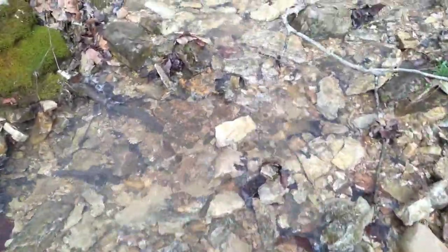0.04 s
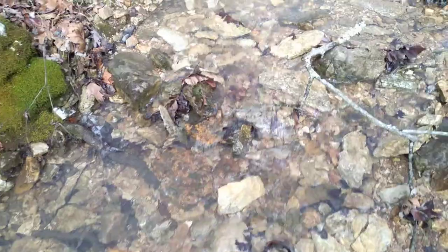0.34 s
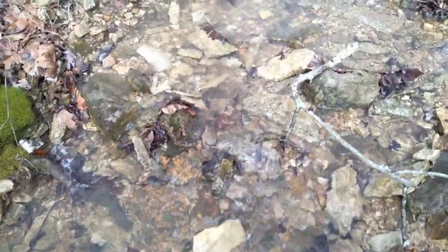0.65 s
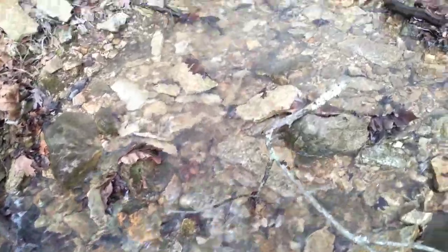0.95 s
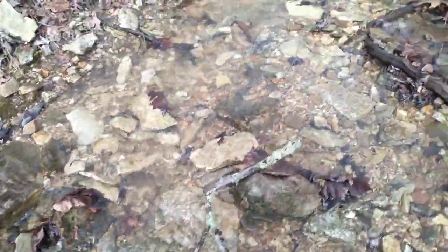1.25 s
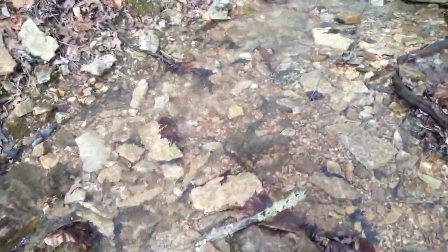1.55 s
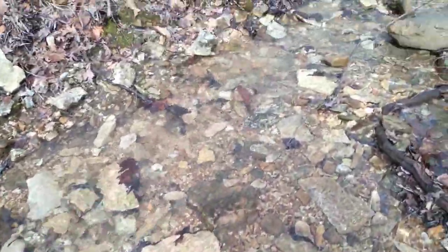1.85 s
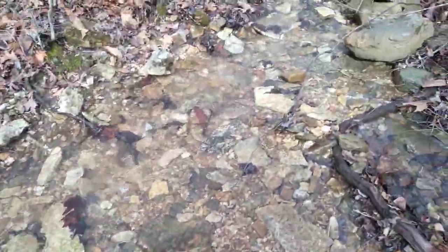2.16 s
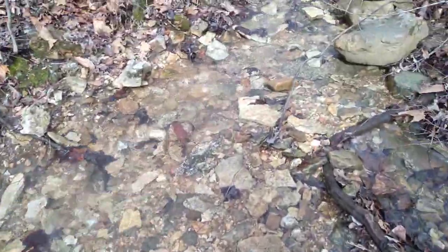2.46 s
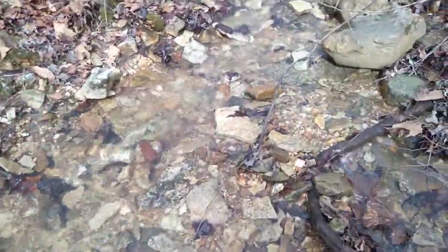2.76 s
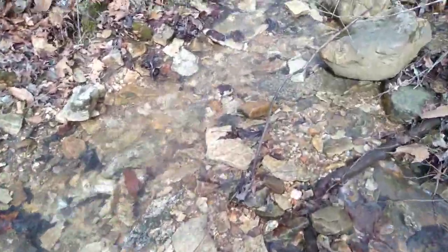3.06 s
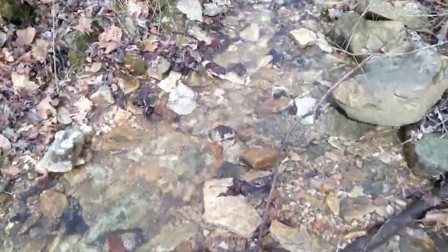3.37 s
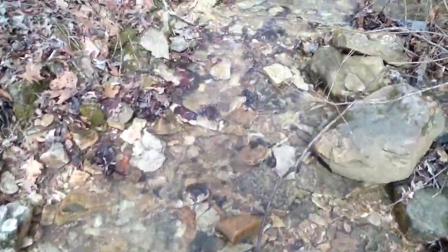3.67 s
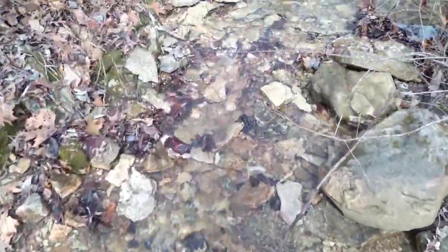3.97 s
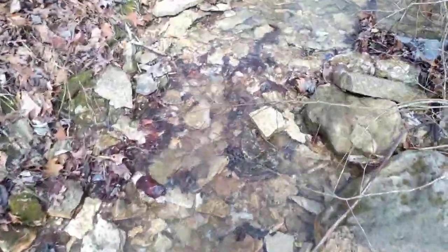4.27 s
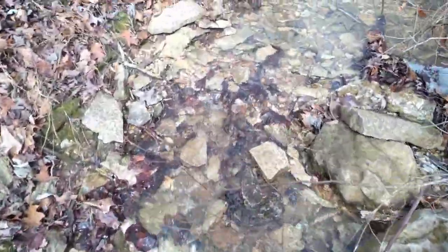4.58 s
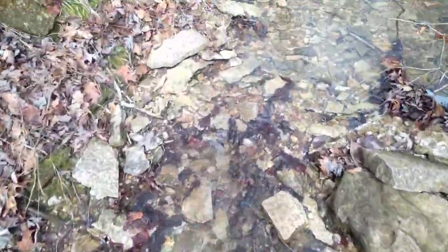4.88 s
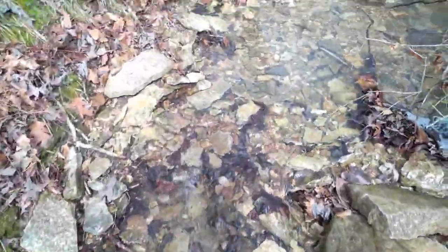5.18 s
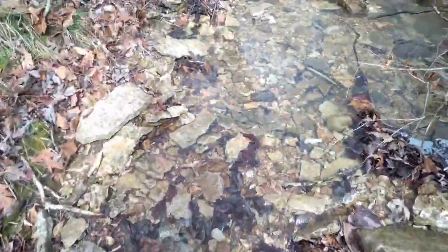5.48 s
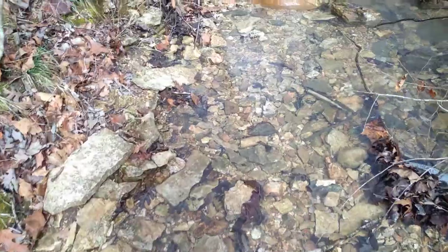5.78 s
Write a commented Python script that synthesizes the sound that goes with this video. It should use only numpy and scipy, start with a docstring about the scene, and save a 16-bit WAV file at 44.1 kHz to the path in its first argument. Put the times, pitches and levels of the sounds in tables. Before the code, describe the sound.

Someone wades over wet gravel in a softly trickling stream, with light splashes, gurgles and a few sharp stone cracks.

```python
"""A shallow stony creek, walked with slow, uneven steps and heard from a hand-held microphone.
Impacts excite damped resonances: boots thud and grind into wet gravel, a loose slab knocks hollowly,
stones crack together and pebbles tick. Air bubbles oscillate as glugs and plips around the boots,
and droplets patter down. Wet clothing ticks and crackles with friction close on the right,
while the creek trickles underneath."""
import sys
import numpy as np
from scipy import signal
from scipy.fft import rfft, irfft
from scipy.io import wavfile
from scipy.ndimage import uniform_filter1d

SR = 44100
rng = np.random.default_rng(int(sys.argv[2]) if len(sys.argv) > 2 else 0)


def persist_wave(psi):
    """Save psi, clipped to +-1, as 16-bit WAV."""
    counts = np.round(np.clip(psi, -1, 1) * 32767).astype(np.int16)
    wavfile.write(sys.argv[1], SR, np.atleast_2d(counts).T)


N = 266414
TIME = np.arange(N) / SR
AGE = TIME[:SR // 5]   # time since the onset of a short event

# Levels in all tables are relative; pan is left minus right.
# a boot lands and rolls: (time [s], roll length [s], squelch [dB], gravel [dB], spray [dB], rustle [dB])
STEPS = [(0.271, 0.17, -73, -50, -56, -85), (1.058, 0.092, -61.5, -47, -52, -56),
         (1.699, 0.15, -59, -64, -58.5, -50.5), (2.55, 0.074, -55.5, -57, -54, -54),
         (3.47, 0.023, -62, -60, -63, -68), (4.115, 0.2, -64, -50, -50, -51),
         (4.922, 0.1, -61, -51, -48.5, -51.5), (5.617, 0.21, -69, -56.5, -55.5, -70.5)]
# a leg swings through the shallows: (time [s], length [s], rustle [dB], drips [dB], dragged gravel [dB])
SWINGS = [(0.076, 0.17, -66, -59.5, -61), (0.463, 0.4, -64.5, -61, -64), (0.92, 0.18, -55, -59.5, -52),
          (1.235, 0.29, -59, -61.5, -72), (1.442, 0.13, -57, -74.5, -52), (2.047, 0.15, -57.5, -71, -73.5),
          (2.362, 0.14, -56.5, -83, -75.5), (2.908, 0.033, -61.5, -66, -67),
          (4.508, 0.12, -60.5, -51, -48.5), (4.687, 0.19, -61, -67.5, -59), (5.587, 0.02, -62, -45, -62.5),
          (5.85, 0.42, -69, -60.5, -61)]
# spectrum of a hard snap: (frequency [Hz], level [dB])
SNAP_SPECTRUM = [(200, -41), (1000, -11.5), (1700, -4), (2400, -2), (3300, -10.5), (4600, -2), (6800, 0),
                 (7800, 2), (10200, 4.5), (13000, -4.5), (15500, -5.5)]
# spectrum of churned water: (frequency [Hz], level [dB])
SQUELCH_SPECTRUM = [(35, -27), (80, -10.5), (150, -3), (320, 0.5), (520, 0.5), (850, -12.5), (1500, -20),
                    (3000, -42)]


def from_db(db):
    return 10 ** (np.asarray(db) / 20)


def rms_one(x):
    return x / np.sqrt(np.mean(x ** 2) + 1e-20)


def peak_one(x, size=88):
    """Short-time normalisation: the loudest two milliseconds get rms 1."""
    power = np.mean(np.atleast_2d(x) ** 2, axis=0)
    return x / np.sqrt(uniform_filter1d(power, size).max() + 1e-20)


def panned(left_db):
    """Constant-power panning: left and right gains."""
    return rms_one(from_db(np.array([[left_db], [-left_db]]) / 2))


def add(out, s, sound):
    """Superposition: mix a short stereo sound in at time s."""
    start = int(np.clip(round(s * SR), 0, N - 1))
    out[:, start:start + sound.shape[1]] += sound[:, :N - start]


def excite(response, force):
    """Convolution: a linear resonator answers every impulse of a short force."""
    return signal.fftconvolve(response, force, axes=1)[:, :len(AGE)]


def coloured(x, spectrum, size=2048):
    """Minimum-phase filtering imposes a spectrum causally: nothing sounds early."""
    hz, level_db = np.transpose(spectrum)
    grid = np.maximum(np.arange(size // 2 + 1) * SR / size, 1)
    shape_db = np.interp(np.log(grid), np.log(hz), level_db) - 20 * np.log10(np.maximum(grid / hz[-1], 1))
    cepstrum = irfft(np.log(from_db(shape_db)))
    response = irfft(np.exp(rfft(2 * cepstrum[:size // 2], size)))
    return signal.oaconvolve(x, rms_one(response)[None], axes=1)[:, :x.shape[1]]


def drift(per_s, size=64):
    """Low-passed noise with a spread near 1, wandering about per_s times a second."""
    pole = np.exp(-2 * np.pi * per_s * size / SR)
    noise = rng.standard_normal(2 * N // size)
    slow = signal.lfilter([1], [1, -2 * pole, pole * pole], noise)[-(N // size):]
    return np.interp(np.arange(N) / size, np.arange(len(slow)), np.clip(rms_one(slow), -2, 2))


def grains(per_s, spread_db, hiss_db, count=len(AGE)):
    """Shot noise: uneven clicks over a fine hiss, each with its own lag between the microphone ports."""
    at = rng.integers(0, count, max(int(per_s * count / SR), 1))
    sizes = from_db(spread_db * np.minimum(rng.exponential(1, len(at)), 3)) * rng.choice([-1, 1], len(at))
    lag = np.rint(rng.normal(4, 3.5, len(at))).astype(int)
    clicks = np.zeros((2, count))
    clicks[0, at] = sizes
    clicks[1, np.clip(at + lag, 0, count - 1)] = sizes
    left, independent = rng.standard_normal((2, count))
    right = .8 * np.roll(left, 3) + .6 * independent
    return rms_one(clicks) + from_db(hiss_db) * np.array([left, right])


def ringing_grains(per_s, spread_db, hiss_db, low_hz, high_hz, cycles, patchy_db, spurts_per_s, count):
    """Shot noise drives a resonator bank: each grain size has its own pitch and its own spurts."""
    out, together = 0, drift(spurts_per_s)
    for hz in np.geomspace(low_hz, high_hz, count):
        radius, angle = from_db(-60 * hz / (cycles * SR)), 2 * np.pi * hz / SR
        clicks = grains(per_s / count, spread_db, hiss_db, N)
        clicks *= from_db(patchy_db * (drift(spurts_per_s) + .5 * together))
        for _ in range(2):   # a rounded onset and steep skirts
            clicks = signal.lfilter([1, 0, -1], [1, -2 * radius * np.cos(angle), radius ** 2], clicks)
        out = out + np.sqrt(hz) * rms_one(clicks)
    return rms_one(out)


def ring(hz, t60, lag_s=0., rise=0., attack_s=1e-4, count=len(AGE)):
    """Damped oscillation at both ports; the pitch climbs by the fraction rise in t60 seconds."""
    t = np.maximum(AGE[:count] - np.array([[0], [lag_s]]), 0)
    phase = 2 * np.pi * hz * (t + rise * t * t / (2 * t60))
    return np.sin(phase) * np.exp(-np.log(1000) * t / t60) * (1 - np.exp(-t / attack_s)) ** 2


def swell(s, hold_s, rise_s, fall_s):
    """Exponential envelope: it builds up to time s, holds and decays."""
    early, late = np.maximum(s - TIME, 0), np.maximum(TIME - s - hold_s, 0)
    return np.exp(-np.minimum(early / rise_s + late / fall_s, 20))


def stepping(levels_db, lag_s, roll_share, rise_s, fall_s):
    """Summed envelopes: each peaks lag_s after a landing and holds for a share of the roll."""
    return sum(from_db(db) * swell(s + lag_s, roll_share * roll_s, rise_s, fall_s)
               for (s, roll_s, *_), db in zip(STEPS, levels_db))


def swinging(levels_db):
    """Summed envelopes: each holds as long as the leg swings."""
    return sum(from_db(db) * swell(s, length, rise_s=0.014, fall_s=0.05)
               for (s, length, *_), db in zip(SWINGS, levels_db))


def gait(spurt_db=4.5, spurts_per_s=14, wake_db=-22, idle_spray_db=-73, idle_rustle_db=-70):
    """Amplitude modulation: a step splashes, grinds, then squeezes water out; a swing drips and drags."""
    _, _, squelch_db, gravel_db, spray_db, rustle_db = np.transpose(STEPS)
    _, _, flap_db, drip_db, drag_db = np.transpose(SWINGS)
    drag = swinging(drag_db)
    squelch = stepping(squelch_db, lag_s=0.022, roll_share=0.9, rise_s=0.056, fall_s=0.078)
    gravel = stepping(gravel_db, lag_s=0.006, roll_share=1.0, rise_s=0.026, fall_s=0.036)
    splash = stepping(spray_db, lag_s=0.0026, roll_share=0.15, rise_s=0.071, fall_s=0.14)
    rustle = stepping(rustle_db, lag_s=0.061, roll_share=0.83, rise_s=.035, fall_s=0.037)
    # wet clothes drip and crackle in shared spurts and never quite stop
    spurts = from_db(spurt_db * drift(spurts_per_s))
    spraying = spurts * np.hypot(splash + swinging(drip_db), from_db(idle_spray_db))
    rustling = spurts * np.hypot(rustle + swinging(flap_db), from_db(idle_rustle_db))
    return squelch + from_db(wake_db) * drag, gravel + drag, spraying, rustling


def gurgle(hz, climb, gap_s, step_db, cycles, count=4):
    """Bubble break-up: trapped air splits into a quick train of ever smaller, higher bubbles."""
    out, size, start = np.zeros((2, len(AGE))), 1500, 0
    for k, (pitch, strength, wait, side) in enumerate(rng.standard_normal((count, 4))):
        bubble_hz = hz * np.exp(climb * (k - 1) + .08 * pitch)
        bubble = ring(bubble_hz, cycles / bubble_hz, side * 0.0001, rise=0.12, attack_s=0.0033, count=size)
        out[:, start:start + size] += from_db(step_db * k + 2 * strength) * bubble
        start = min(start + int(gap_s * np.exp(.5 * wait) * SR), len(AGE) - size)
    return peak_one(out)


def trickle():
    """Resonance of a crowd of small bubbles, in restless spurts."""
    return ringing_grains(500, 3, -14, 650, 2400, cycles=18, patchy_db=4, spurts_per_s=14, count=8)


def creek(bubble_db=-66, trickle_db=-72, wash_db=-73, centre_hz=1200, count=110):
    """Bubble resonance: the current sheds gurgles and trickles over a soft wash with a low drone."""
    # spectrum of the wash: (frequency [Hz], level [dB])
    wash_spectrum = [(25, -13), (48, -5), (64, 17.5), (85, -1), (200, -5.5), (350, -6), (600, -0.5),
                     (1200, -9.5), (3500, -6.5), (6000, -26.5), (10000, -17.5), (15500, -18)]
    out = np.zeros((2, N))
    for k, (when, pitch, size, side) in enumerate(rng.standard_normal((count, 4)).clip(-2, 2)):
        babble = gurgle(centre_hz * np.exp(.33 * pitch), climb=.13, gap_s=.011, step_db=-1.5, cycles=17)
        add(out, (k + when) / count * N / SR, from_db(bubble_db + 2 * size) * panned(2 * side) * babble)
    wash = coloured(rng.standard_normal(N) + .5 * rng.standard_normal((2, N)), wash_spectrum)
    return out + from_db(trickle_db) * trickle() + from_db(wash_db) * rms_one(wash)


def cloth(rustling, bounce=.6, bounce_s=0.00033, sway=.14):
    """Friction crinkles wet cloth; interference with its echo off the moving body sweeps notches."""
    # spectrum of wet cloth: (frequency [Hz], level [dB])
    rustle_spectrum = [(600, -25), (3200, -8.5), (4300, -18.5), (6000, -15), (7800, -2.5), (9700, 1),
                       (11500, -7), (12700, -16.5), (15500, -16)]
    crinkle = grains(70, 5, -9, N)
    snaps = ringing_grains(1400, 5, -5, 2800, 12000, cycles=12, patchy_db=3.5, spurts_per_s=14, count=12)
    rub = np.sqrt(.5) * crinkle + snaps
    delay_s = bounce_s * np.exp(sway * drift(2.6))
    reflected = np.array([np.interp(TIME - delay_s, TIME, side) for side in rub])
    return rustling * rms_one(coloured(rub + bounce * reflected, rustle_spectrum)) * panned(-25.5)


def spray(spraying, level_db=-3.0):
    """Drop impact: spray falls ahead as sharp splats among many briefly ringing droplets."""
    # spectrum of falling spray: (frequency [Hz], level [dB])
    spray_spectrum = [(1000, -38.5), (3700, -18), (5000, 0.5), (6800, 2.5), (10000, -3.5), (12500, -12.5),
                      (16000, -13)]
    splats = grains(90, 5, -8, N)
    drops = ringing_grains(1800, 4, -6, 4300, 12000, cycles=12, patchy_db=3.8, spurts_per_s=14, count=10)
    return from_db(level_db) * spraying * rms_one(coloured(splats + drops, spray_spectrum)) * panned(-2.5)


def ticks(cycles=15, chatter_db=-15, chatter_s=0.0038, scrape_db=-13):
    """Damped vibration: sharp ticks of pebbles, and of wet clothing close on the right."""
    # pebble and clothing ticks: (time [s], level [dB], frequency [Hz], pan [dB])
    sharp_ticks = [(0.0728, -39, 8800, -7), (0.464, -31.5, 10250, -9), (0.8801, -26, 10400, -7),
                   (0.891, -30.5, 8200, -9), (0.9014, -26, 9500, 5), (1.0797, -36.5, 10100, -17),
                   (1.2376, -34, 9300, -22), (1.294, -35.5, 8900, -34), (1.3168, -35, 9550, -34),
                   (1.8036, -30.5, 8700, -3), (1.8096, -30.5, 9300, -4), (2.057, -38.5, 8400, -23),
                   (2.4367, -40, 9000, -14), (2.588, -8.5, 9600, -11), (2.6387, -26, 9600, 2),
                   (2.824, -42, 8700, -20), (3.58, -30.5, 5230, -5.5), (3.587, -34, 8400, -11),
                   (4.078, -36.5, 9800, -6), (4.2385, -30, 11100, -5), (4.2945, -39.5, 7700, 5),
                   (4.436, -46, 10400, -3), (5.2622, -40.5, 9840, -7)]
    out = np.zeros((2, N))
    settling = np.exp(-AGE / chatter_s) * (1 - np.exp(-AGE / 0.00099))
    for s, db, hz, pan_db in sharp_ticks:
        tone = ring(hz, cycles / hz, lag_s=.00004, attack_s=0.00026)
        chatter = grains(5500, 0.59, -2.5) * settling
        rattle = from_db(chatter_db) * peak_one(excite(tone, chatter))
        scrape = from_db(scrape_db) * peak_one(coloured(chatter, SNAP_SPECTRUM))
        add(out, s, from_db(db) * panned(pan_db) * peak_one(peak_one(tone) + rattle + scrape))
    return out


def tread(churning, grinding, gravel_db=-7.5, gurgle_db=-3.5):
    """Friction and bubble resonance: under the walker's weight pebbles grind and water churns."""
    # spectrum of grinding pebbles: (frequency [Hz], level [dB])
    gravel_spectrum = [(400, -20), (900, -3), (1400, -4), (2000, 1), (2600, -3.5), (3500, -17), (6000, -42)]
    squelch = ringing_grains(450, 4, -12, 120, 800, cycles=6, patchy_db=4, spurts_per_s=25, count=6)
    gravel = ringing_grains(1800, 3, -7, 800, 3800, cycles=9, patchy_db=3.5, spurts_per_s=16, count=7)
    water = rms_one(coloured(squelch, SQUELCH_SPECTRUM)) + from_db(gurgle_db) * trickle()
    return churning * water + from_db(gravel_db) * grinding * rms_one(coloured(gravel, gravel_spectrum))


def thuds(level_db=0.5, t60=0.01, attack_s=0.0024, sink_s=0.002, slosh_db=-15, firm_db=-40):
    """Damped impact: a boot pushes into the bed and the displaced water sloshes back."""
    # boot impacts: (time [s], level [dB], frequency [Hz])
    impacts = [(0.084, -50.5, 266), (0.252, -38.5, 336), (0.275, -39, 365), (0.318, -41.5, 292),
               (0.904, -41, 288), (1.073, -40, 307), (1.162, -27, 399), (1.6446, -35, 417),
               (2.588, -40.5, 423), (2.666, -48.5, 438), (2.712, -49.5, 189), (3.318, -50.5, 268),
               (3.377, -40.5, 352), (3.498, -45, 340), (4.09, -37.5, 387), (4.46, -38, 372),
               (4.764, -34, 204), (4.954, -40.5, 346), (5.655, -34, 245), (5.679, -45, 404),
               (6.01, -43, 386)]
    out = np.zeros((2, N))
    surge = (1 - np.exp(-AGE / 0.0093)) * np.exp(-AGE / 0.012)
    for s, db, hz in impacts:
        overtone = from_db(-10) * ring(hz * 1.763, t60 * 0.89, attack_s=attack_s)
        push = peak_one(ring(hz, t60, attack_s=attack_s) + overtone)
        slosh = peak_one(coloured(grains(770, 3, -13) * surge, SQUELCH_SPECTRUM))
        churn = from_db(slosh_db + 0.87 * (firm_db - db))   # the lighter the landing, the more it churns
        add(out, s + sink_s, from_db(db + level_db) * peak_one(push + churn * slosh))
    return out


def handling(weight, weight_db=-11.5, fall_s=0.054):
    """Structure-borne sound: each shift of weight sends rumble through the hand into the microphone."""
    # jolts of the hand: (time [s], level [dB], rise time [s])
    hand_jolts = [(0.089, -58, 0.0079), (1.05, -54.5, 0.015), (1.19, -48.5, 0.048), (1.848, -55.5, 0.0087),
                  (2.679, -58.5, 0.026), (3.48, -58, 0.033), (4.2, -59, 0.026), (4.775, -54, .008),
                  (5.645, -47.5, 0.019)]
    # spectrum of the rumble: (frequency [Hz], level [dB])
    rumble_spectrum = [(20, -34.5), (45, -10.5), (70, 3), (110, -2), (170, -14.5), (300, -27), (600, -25)]
    jolts = sum(from_db(db) * swell(s, 0, rise_s, fall_s) for s, db, rise_s in hand_jolts)
    shake = np.hypot(jolts, from_db(weight_db) * weight)
    lumps = rng.standard_normal(N) + .9 * rng.standard_normal((2, N))
    return shake * from_db(0.57 * drift(23)) * rms_one(coloured(lumps, rumble_spectrum)) * panned(2.3)


def glugs(cycles=12, rise=0.13, attack_s=0.0021, followers_db=-7):
    """Bubble resonance: a large pocket of air rings low and briefly, then breaks up."""
    # air trapped as water closes over a boot: (time [s], level [dB], frequency [Hz])
    air_pockets = [(0.106, -56, 460), (1.027, -55, 170), (1.537, -51.5, 267), (1.587, -50.5, 330),
                   (1.691, -45, 284), (1.764, -46, 355), (2.487, -53.5, 276), (2.556, -49.5, 380),
                   (4.067, -50.5, 396), (4.525, -49.5, 456), (4.786, -49, 266), (5.009, -55, 340),
                   (5.712, -46.5, 445), (5.774, -50, 406)]
    out = np.zeros((2, N))
    for s, db, hz in air_pockets:
        pocket = peak_one(ring(hz, cycles / hz, rise=rise, attack_s=attack_s))
        followers = gurgle(hz, climb=0.13, gap_s=0.0056, step_db=2.5, cycles=7.2)
        add(out, s, from_db(db) * peak_one(pocket + from_db(followers_db) * followers))
    return out


def plips(level_db=2.5, froth_db=-7, froth_s=0.014, cycles=23, rise=0.13, followers_db=-7):
    """Resonance: rising, frothy plips of bubbles, and one late hollow ring of the loose slab."""
    # bubble plips, and the slab's ring at 0.463 s: (time [s], level [dB], frequency [Hz])
    resonances = [(0.146, -54, 1050), (0.463, -37, 820), (0.490, -47, 890), (0.806, -42.5, 1335),
                  (1.38, -55, 1380), (1.699, -50.5, 1120), (1.765, -51.5, 1180), (1.9, -51, 2150),
                  (2.054, -53, 646), (2.853, -61.5, 730), (2.928, -59, 777), (3.181, -58.5, 1300),
                  (3.202, -58, 1923), (3.342, -60.5, 1400), (3.585, -51.5, 1470), (3.738, -52.5, 1760),
                  (3.821, -57, 1325), (4.462, -49, 1032), (4.525, -50.5, 1190), (4.547, -45.5, 1890),
                  (4.618, -56, 1270), (4.68, -47.5, 1890), (4.879, -52.5, 1580), (5.031, -41.5, 1670),
                  (5.47, -50.5, 1675), (5.487, -53.5, 1316)]
    out = np.zeros((2, N))
    for s, db, hz in resonances:
        tone = peak_one(ring(hz, cycles / hz, rng.normal(0, .0001), rise, attack_s=0.0021))
        followers = gurgle(hz, climb=0.11, gap_s=0.0074, step_db=-1.0, cycles=4.2)
        froth = peak_one(excite(followers, grains(900, 2, -9.5) * np.exp(-AGE / froth_s)))
        plip = tone + from_db(followers_db) * followers + from_db(froth_db) * froth
        add(out, s, from_db(db + level_db) * peak_one(plip))
    return out


def crunches(level_db=0.5, attack_s=0.0024, hollow_db=2.0, hollow_t60=0.0061):
    """Cavity resonance: slipping wet gravel rings the pocket under the sole while grit sizzles."""
    # gravel gives way: (time [s], level [dB], length [s], grit over body [dB], pocket frequency [Hz])
    slips = [(0.2742, -29, 0.0082, -9.5, 1960), (0.305, -41, 0.034, -25, 1700),
             (1.075, -39.5, 0.022, 0, 2060), (1.135, -53, 0.038, -9, 2050),
             (1.602, -48.5, 0.017, -3.5, 2050), (1.682, -47.5, 0.04, -30, 2230),
             (1.762, -52.5, 0.036, -11, 1210), (1.854, -39.5, 0.013, -10, 2370),
             (2.193, -55, 0.026, -11.5, 2860), (3.467, -28.5, 0.0096, 4, 1900),
             (4.091, -34, 0.019, -10, 1840), (4.1066, -38, 0.04, 1, 1600),
             (4.121, -30.5, 0.022, -4.5, 1930), (4.189, -33.5, 0.0042, -6, 2200),
             (4.202, -38, 0.031, -1.5, 2020), (4.703, -44, 0.0072, -32, 2060),
             (4.9096, -29, 0.015, -4, 2520), (4.94, -39, 0.02, -22, 1790), (5.605, -51.5, 0.036, 11, 2000),
             (5.616, -38, 0.015, 5.5, 1990), (5.633, -44.5, 0.019, -8, 1610)]
    # spectra of the gravel's body and of its grit: (frequency [Hz], level [dB])
    body_spectrum = [(100, -14.5), (350, 0), (850, -10.5), (1700, 4), (2200, 7.5), (3200, -8),
                     (5000, -20.5)]
    grit_spectrum = [(2500, -23.5), (3800, -17), (4900, -6.5), (7000, -9), (10000, -3.5), (13000, -22.5),
                     (15500, -23)]
    out = np.zeros((2, N))
    for s, db, length, grit_db, hz in slips:
        slip = (1 - np.exp(-AGE / attack_s)) ** 2 * np.exp(-2 * AGE / max(length, attack_s))
        contacts = grains(3500, 1.0, -4.5) * slip
        pocket = peak_one(excite(ring(hz, hollow_t60), contacts))
        body = peak_one(peak_one(coloured(contacts, body_spectrum)) + from_db(hollow_db) * pocket)
        grit = peak_one(coloured(grains(3600, 11.0, 3.6) * slip, grit_spectrum))
        add(out, s, from_db(db + level_db) * (body + from_db(grit_db) * panned(-7.5) * grit))
    return out


def cracks(level_db=-7.0, tail_s=0.017, tail_db=-19, onset_s=0.0011, ring_db=-4, t60=0.026):
    """Impact excitation: a hard contact snaps and leaves the stones ringing, then loose grit settles."""
    # stone on stone: (time [s], level [dB], length [s], pan [dB], pitch ratio, lower for a larger stone)
    collisions = [(0.318, -39.5, 0.0011, 5, 0.89), (1.3397, -28, 0.00052, -24, 0.84),
                  (2.579, -23, 0.0011, 7, 1.04), (3.4701, -16.5, 0.00047, -4.5, 0.94),
                  (3.4711, -10.5, 0.00062, -3.5, 0.95), (3.482, -21.5, 0.0009, -1, 0.93),
                  (3.488, -25, 0.0031, -5, 0.94), (4.9133, -8, 0.0013, 0, 1.024),
                  (4.9172, -14.5, 0.00089, 0, 0.91), (5.673, -34, 0.0005, -22, 1),
                  (5.678, -36, 0.0015, -15, 0.91), (5.688, -36, 0.00096, -6, 1.05)]
    # modes of the stones: (frequency [Hz], level [dB])
    stone_modes = [(1680, -14), (2180, -7.5), (4610, -0.5), (5520, 4), (7830, -5.5), (9540, 6), (10700, 3)]
    out = np.zeros((2, N))
    for s, db, length, pan_db, ratio in collisions:
        attack = 1 - np.exp(-(AGE / length) ** 2)
        decay = np.exp(1 - AGE / length) + from_db(tail_db) * np.exp(-AGE / tail_s)
        contacts = grains(12000, 2, -2) * attack * decay
        modes = sum(from_db(mode_db) * ring(hz * ratio * rng.normal(1, .015), t60, lag_s=.00003)
                    for hz, mode_db in stone_modes)
        ringing = from_db(ring_db) * peak_one(excite(modes, contacts))
        snap = peak_one(coloured(contacts, [(hz * ratio, band_db) for hz, band_db in SNAP_SPECTRUM]))
        add(out, s + onset_s, from_db(db + level_db) * panned(pan_db) * peak_one(snap + ringing))
    return out


def slab(t60=0.016, lag_s=0.000076, low_cut_hz=340, grit_db=-13, slosh_db=-25, slosh_s=0.011):
    """Modal vibration: each knock rings a loose slab, grinds grit and stirs the water under it."""
    # the slab rocks: (time [s], level [dB])
    knocks = [(0.362, -29.5), (0.371, -28.5), (0.378, -13.5), (0.392, -21)]
    # modes of the slab over its pocket of water: (frequency [Hz], level [dB], share of the ring time)
    slab_modes = [(793, -3.5, 0.93), (1757, -18, 0.97)]
    # spectrum of stirred grit and water: (frequency [Hz], level [dB])
    slosh_spectrum = [(300, -13), (650, -0.5), (1100, 5.5), (2100, 0.5), (3200, -10), (6000, -40.5)]
    out = np.zeros((2, N))
    modes = peak_one(sum(from_db(db) * ring(hz, t60 * share, lag_s) for hz, db, share in slab_modes))
    fade = from_db(grit_db) * np.exp(-AGE / 0.0084) + from_db(slosh_db) * np.exp(-AGE / slosh_s)
    for s, db in knocks:
        stir = fade * rms_one(coloured(grains(4000, 6.1, -15.5), slosh_spectrum))
        add(out, s, from_db(db) * peak_one(modes + stir))
    return signal.sosfilt(signal.butter(2, low_cut_hz, "high", fs=SR, output="sos"), out) * panned(-1.2)


def patters(attack_s=0.00086, cycles=14, spread=0.11, length_s=0.019, pan_db=-9, count=6):
    """Drop impact: a clump of droplets lands within a moment and rings at neighbouring pitches."""
    # clumps of droplets and grit: (time [s], level [dB], centre frequency [Hz])
    clumps = [(0.874, -38, 6130), (1.239, -42, 7040), (1.49, -44.5, 7060), (5.29, -47.5, 6640),
              (5.84, -46, 5630)]
    out, size = np.zeros((2, N)), SR // 10
    fall = (1 - np.exp(-AGE[:size] / attack_s)) * np.exp(-(AGE[:size] / length_s) ** 2)
    for s, db, hz in clumps:
        drops = 0
        for pitch in hz * np.exp(spread * rng.standard_normal(count).clip(-2, 2)):
            hits = grains(700, 17.0, -33, size) * fall
            drops = drops + signal.fftconvolve(hits, ring(pitch, cycles / pitch, count=size), axes=1)
        add(out, s, from_db(db) * panned(pan_db) * peak_one(drops))
    return out


def banks(x, wet_db=-15, near_s=0.0047, far_s=0.046, far_db=-15):
    """Scattering: rocks return the sound at once, the wooded banks a little later."""
    # spectrum of the echo: (frequency [Hz], level [dB])
    echo_spectrum = [(100, -11), (600, 1.5), (2000, 1), (6000, -0.5), (10000, 5.5), (16000, -24.5)]
    t = TIME[:SR // 2]
    fade = (np.exp(-t / near_s) + from_db(far_db) * np.exp(-t / far_s)) * (1 - np.exp(-t / 0.0055))
    echo = rms_one(coloured(rng.standard_normal((2, len(t))) * fade, echo_spectrum)) / np.sqrt(len(t))
    return from_db(wet_db) * signal.oaconvolve(x, echo, axes=1)[:, :N]


def left_port(x):
    """Frequency response: the left microphone port has two dips and a peak; the right is flat."""
    # bands of the port: (frequency [Hz], gain [dB], quality factor)
    bands = [(2630, -4, 2.6), (4300, 6.5, 2.9), (9400, -8, 4.3)]
    left = x[0]
    for hz, gain_db, q in bands:
        left = left + (from_db(gain_db) - 1) * signal.lfilter(*signal.iirpeak(hz, q, fs=SR), left)
    return np.array([left, x[1]])


def scene(near_echo_db=-14):
    """Superposition of steps, echo and creek; direct sound dominates close to the microphone."""
    churning, grinding, spraying, rustling = gait()
    stones = slab() + cracks() + crunches()
    water = plips() + glugs() + patters() + spray(spraying)
    steps = thuds() + stones + water + tread(churning, grinding)
    near = ticks() + cloth(rustling)
    return steps + near + banks(steps + from_db(near_echo_db) * near) + creek() + handling(churning)


def record(dry, cutoff_hz=15850):
    """Clipping and band limiting: after the left port, peaks overload and the top treble is cut."""
    low_pass = signal.ellip(10, .2, 70, cutoff_hz, fs=SR, output="sos")
    return signal.sosfilt(low_pass, np.clip(left_port(dry), -1, 1))


dry = scene()
out = record(dry)
persist_wave(out)
```